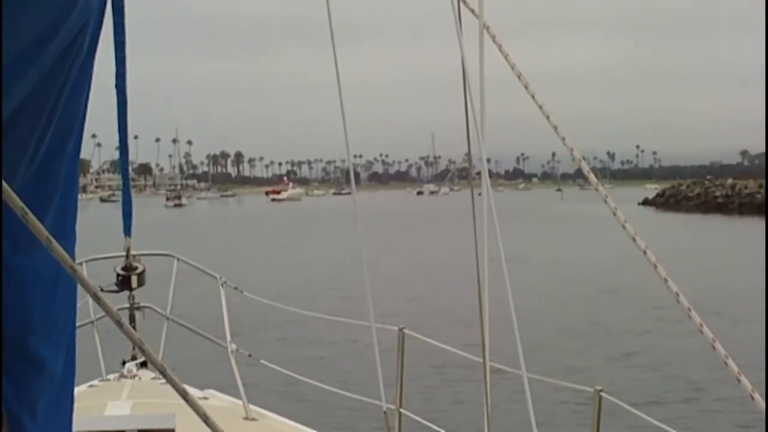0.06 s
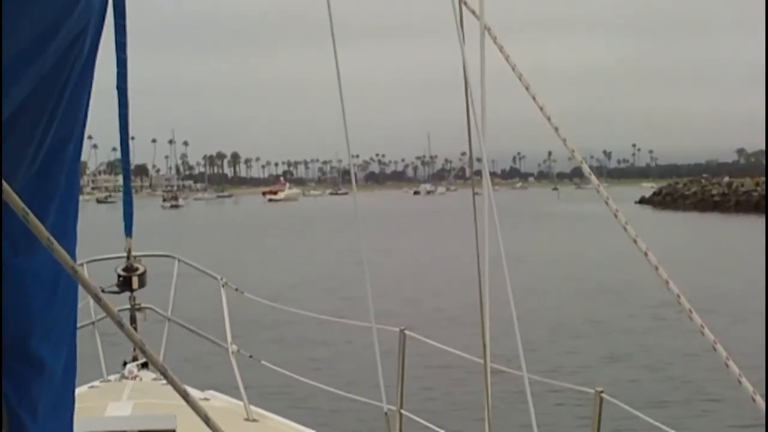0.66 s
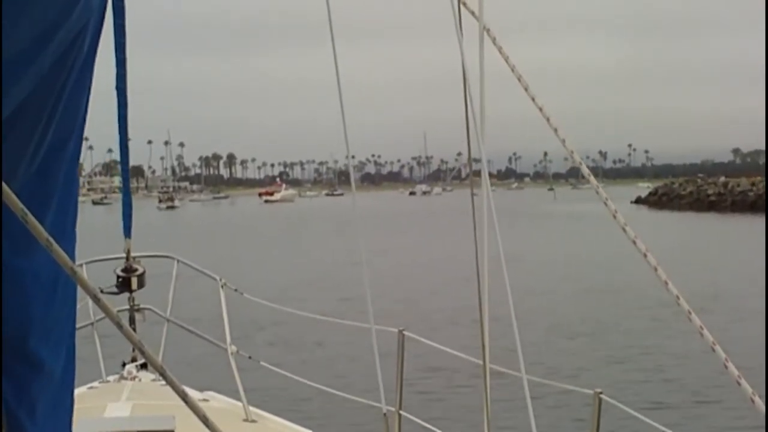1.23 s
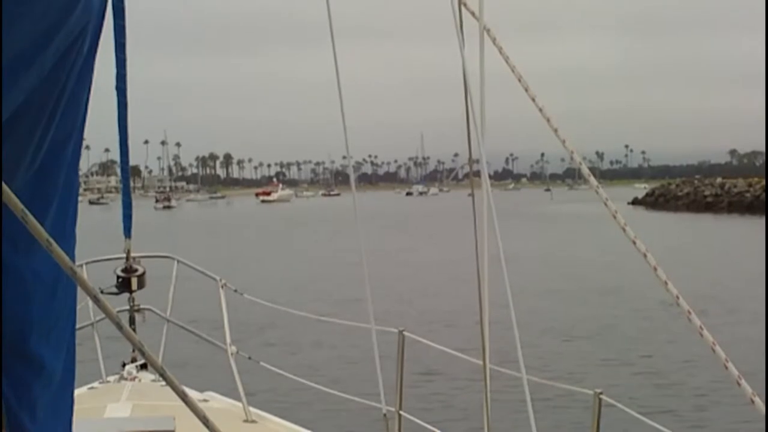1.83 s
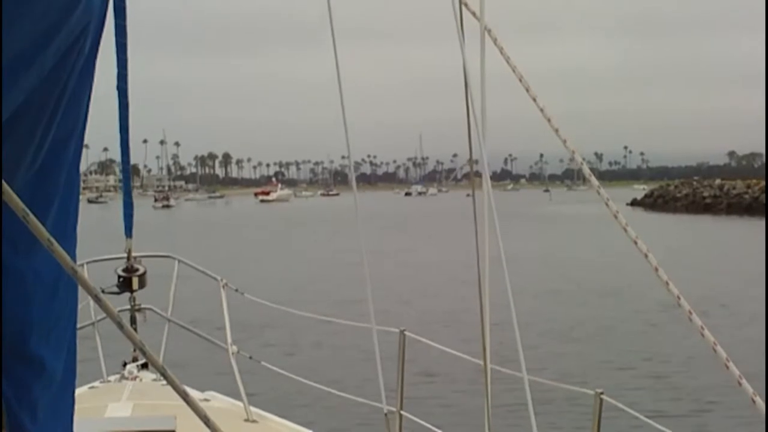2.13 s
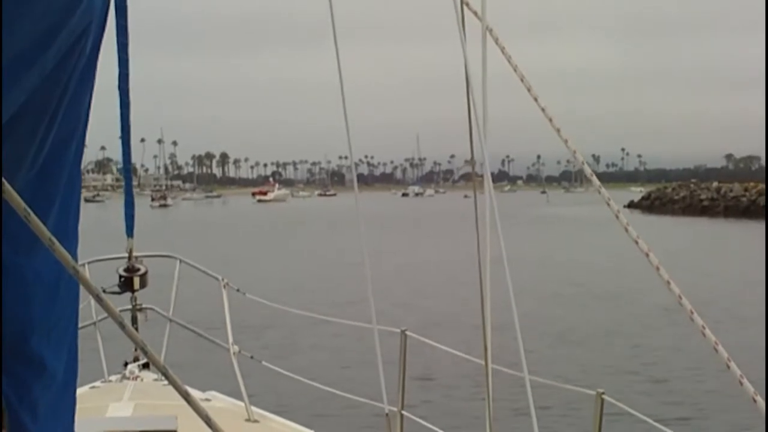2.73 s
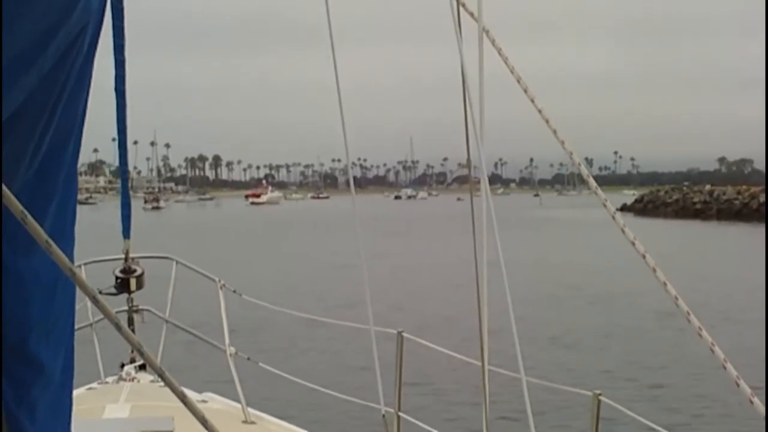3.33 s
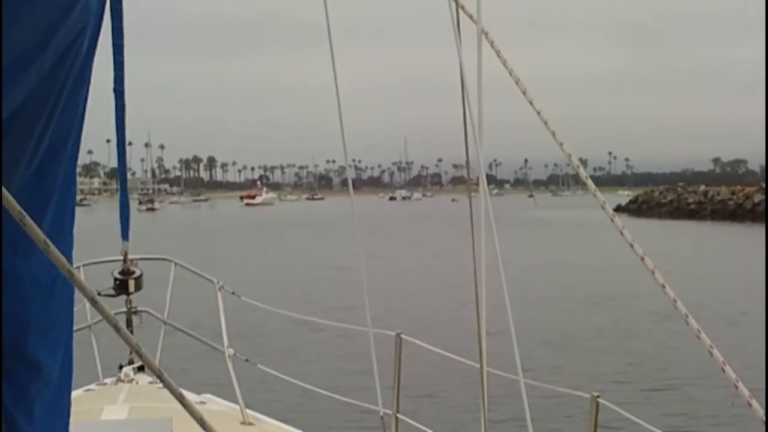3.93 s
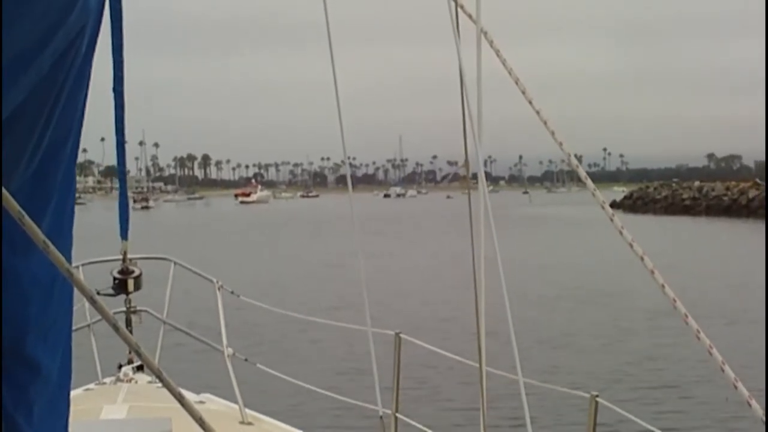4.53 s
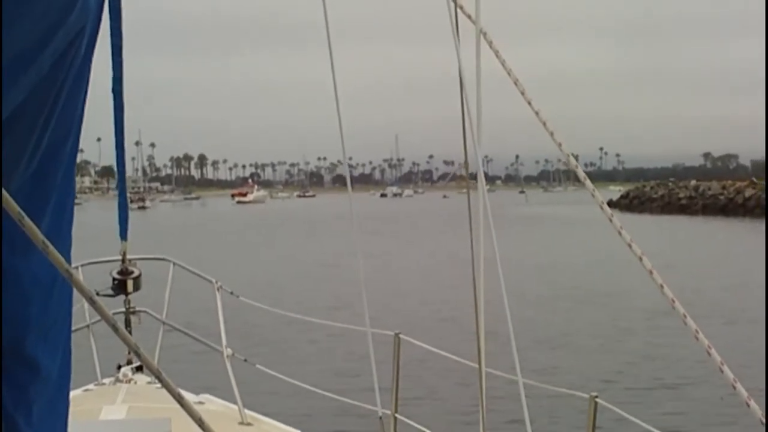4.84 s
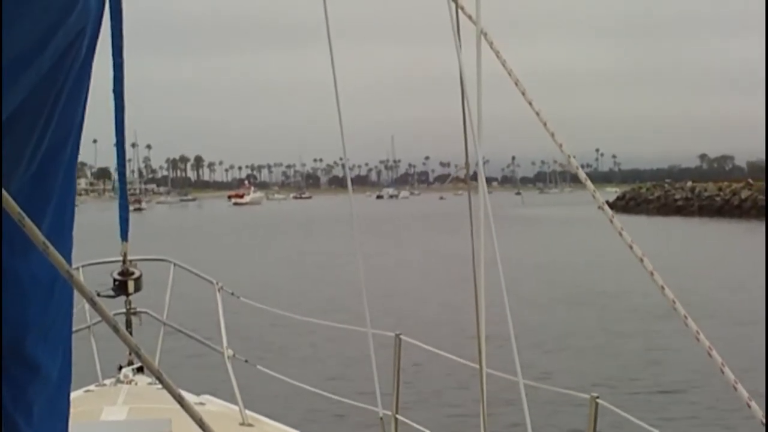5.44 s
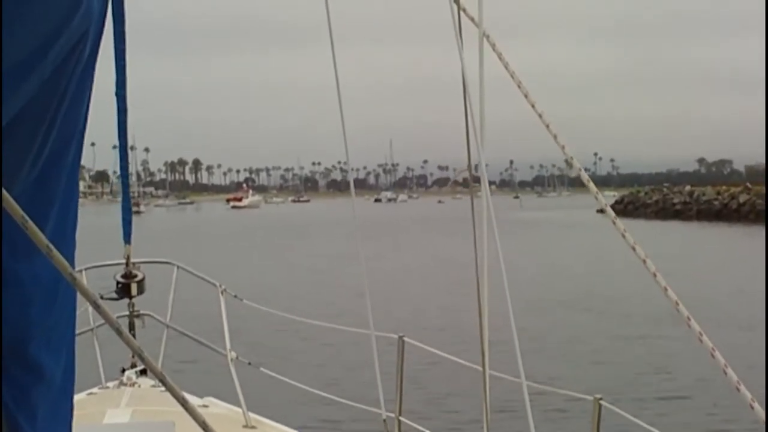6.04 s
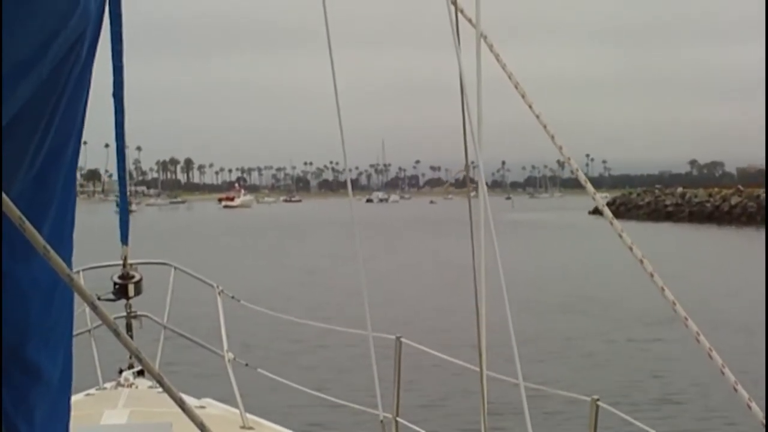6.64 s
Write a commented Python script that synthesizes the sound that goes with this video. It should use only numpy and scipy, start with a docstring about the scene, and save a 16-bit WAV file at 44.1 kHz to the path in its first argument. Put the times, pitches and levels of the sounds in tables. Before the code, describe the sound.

Small birds chirp and trill above a steady wash of wind and far surf, with a few ripples lapping at a sailboat.

```python
"""Water laps at the hull of an anchored sailing boat, heard on deck through one small microphone.
Close by, ripples trap air that rings in plops, and one hollow swell sloshes underneath.
Small birds twitter past on a low and a high voice: arched whistles, trills, two-note flourishes,
pips, and twice the same nasal chatter. Far across the calm harbour motors hum,
and a light wind rumbles over the wash of distant surf."""
import sys
import numpy as np
from scipy import signal
from scipy.fft import rfft, irfft
from scipy.io import wavfile

SR = 44100
rng = np.random.default_rng(int(sys.argv[2]) if len(sys.argv) > 2 else 0)


def transcribe(signal):
    """Save signal, clipped to [-1, 1], as a 16-bit WAV file at the path in sys.argv[1]."""
    frames = np.atleast_2d(signal).T
    limited = np.clip(frames, -1, 1)
    pcm = np.round(limited * 32767).astype(np.int16)
    wavfile.write(sys.argv[1], SR, pcm)


N = 295029
TIME = np.arange(N) / SR

# colours of the wind, the distant surf and the high hiss: f/Hz, relative level/dB
WIND_SPECTRUM = [(20, -15), (34, -12), (48, -1), (65, -1), (95, -0.5), (135, 1), (200, -3.5), (300, -4),
                 (380, -6.5), (450, -17), (700, -31)]
SURF_SPECTRUM = [(300, -32), (440, -9), (530, -0.5), (700, 0), (940, -2), (1110, 2), (1330, -6), (1700, -7),
                 (2050, -13.5), (2900, -15.5), (3400, -19), (5000, -29)]
HISS_SPECTRUM = [(1500, -14), (3200, 0), (4500, 4), (6500, 5.5), (7100, 2), (7500, -37.5)]
# motors far across the water: start/s, end/s, f/Hz, level/dB, waver/share of pitch
MOTOR_HUMS = [(2.5, 4.15, 167, -57.5, 0.0036), (0.3, 2.38, 140, -60.5, 0.01), (0, 3.7, 242, -63.5, .006),
              (5, 6, 127, -60, 0.014), (6, 7.8, 140, -58.5, 0.0095), (-0.5, 7.9, 97, -66.5, 0.017),
              (1.5, 7.7, 50, -64, .02)]

# a whistle's second harmonic, strongest on the low voice: fundamental f/Hz, relative level/dB
OCTAVE_LEVELS = [(1650, -13), (2250, -16.5), (2850, -7), (3400, -19), (3700, -14.5), (4100, -22)]
# resonances of throat and beak: f/Hz, half width/Hz, gain/dB
BEAK_RESONANCES = [(2840, 800, 2), (5700, 230, -12)]
# arched whistles: t/s, length/s, f/Hz, level/dB, accent/dB
ARCHED_WHISTLES = [(.08, .042, 3070, -59, 0), (.61, 0.068, 2970, -62, 0), (.672, .045, 3520, -59, 0),
                   (.727, .058, 3500, -57.5, 0), (1.764, .072, 3000, -54, 9), (2.603, .24, 2305, -63, 1),
                   (4.42, .03, 3080, -57, 0), (4.482, .036, 3030, -49.5, 1), (6.377, 0.068, 2986, -50, 9.5),
                   (6.527, 0.029, 3030, -52.5, 0)]
# runs of buzzy notes: t/s, notes, spacing/s, note length/s, f/Hz, level/dB, change per note/dB
TRILLS = [(.176, 2, .044, .023, 3830, -51, -8), (1.847, 2, 0.042, 0.03, 3690, -41, -2),
          (2.642, 3, .04, 0.017, 3860, -50, -1), (4.559, 2, 0.043, 0.03, 3690, -46, -6),
          (5.52, 2, .045, 0.018, 3880, -48.5, 1.5), (5.533, 2, .053, 0.019, 2790, -43, -3),
          (6.456, 2, .044, 0.024, 3860, -53, 2), (6.462, 2, 0.047, .03, 2800, -42, -2.5)]
# a held high note, then a low drop: t/s, high f/Hz, level/dB, drop delay/s, drop level/dB
CLOSING_FLOURISHES = [(1.957, 3864, -46.5, 0.037, -46), (4.641, 4050, -51, .052, -55),
                      (6.532, 4140, -51, .056, -54)]
# single falling pips: t/s, length/s, f/Hz, level/dB
LONE_PIPS = [(.137, 0.011, 3950, -54), (0.145, .012, 2780, -54), (.223, .012, 2700, -54),
             (1.011, .022, 1648, -45), (1.096, 0.029, 1600, -51), (1.19, .037, 1490, -52),
             (2.146, 0.023, 2700, -53.5), (2.194, 0.011, 2150, -49.5), (2.246, .011, 1920, -48),
             (2.318, .028, 2400, -55), (3.452, .024, 2800, -52.5), (3.533, .014, 3930, -52),
             (4.514, .027, 3950, -46), (4.533, 0.019, 2890, -47), (5.474, .012, 4100, -53),
             (5.484, 0.023, 2860, -48.5), (5.631, .013, 3950, -55.5), (5.643, .018, 2720, -55)]
# a flick up, a slur down, three ticks: delay/s, length/s, f/Hz, glide/share of pitch, relative level/dB
CHATTER_NOTES = [(0, .011, 1333, .2, -3), (0.017, .026, 1471, -.14, -0.5), (0.058, 0.01, 1160, .03, -3.5),
                 (0.097, .009, 543, .14, -4.5), (0.126, .009, 600, .1, -3)]
# each time the chatter comes: t/s, level/dB, fade/(dB/s), ending level/dB
CHATTER_PHRASES = [(.822, -42.5, 26, -54.5), (3.387, -40.5, -2, -46)]
# a note's pitch at its start, middle and end, as shares of its nominal pitch
ARCH_SHAPE, TRILL_SHAPE = (.915, .99, .905), (1.02, .99, .97)
HELD_SHAPE, FALL_SHAPE = (1.012, .99, .97), (1.028, .99, .98)
SLUR_SHAPE, WHINE_SHAPE = (.97, .97, .85), (1.02, .96, .91)

# hollow colour of the swell under the hull: f/Hz, relative level/dB
SLOSH_SPECTRUM = [(90, -31.5), (140, 1.5), (190, -3.5), (270, -7.5), (345, 0.5), (430, -15.5), (900, -10),
                  (1300, -29)]
# ripples closing on the hull, near the microphone: t/s, bubble f/Hz, level/dB
HULL_PLOPS = [(1.421, 616, -32), (1.585, 546, -34.5), (1.594, 720, -38.5), (4.246, 710, -37),
              (4.296, 552, -39.5), (4.374, 1120, -38), (6.105, 1300, -38.5)]


def undb(db):
    """Decibels to gain."""
    return 10 ** (np.asarray(db) / 20)


def unit(x):
    """Scale to rms 1."""
    return x / np.sqrt(np.mean(x ** 2))


def add(out, start, x):
    """Mix x into out from start, in seconds."""
    i = max(int(start * SR), 0)
    out[i:i + len(x)] += x[:max(len(out) - i, 0)]


def decay(t, t60):
    """A fall of 60 dB every t60 seconds."""
    return np.exp(-np.log(1000) * t / t60)


def phase_of(hz):
    """Phase of a moving pitch."""
    return 2 * np.pi * np.cumsum(hz) / SR


def drift(rate_hz):
    """Smooth random motion of rms 1 over the whole scene."""
    hz = np.fft.rfftfreq(N, 1 / SR)
    return unit(irfft(rfft(rng.standard_normal(N)) * np.exp(-(hz / rate_hz) ** 2), N))


def tremor(size, rate_hz):
    """Quick random motion over one note, spread near 1."""
    steps = np.arange(size) * rate_hz / SR
    return np.interp(steps, np.arange(256), rng.standard_normal(256))


def noise(spectrum):
    """Noise of rms 1 in the given colour."""
    hz, db = np.transpose(spectrum)
    f = np.fft.rfftfreq(N, 1 / SR) + 1
    gain = undb(np.interp(np.log(f), np.log(hz), db, left=-80, right=-80))
    return unit(irfft(rfft(rng.standard_normal(N)) * gain, N))


def restless(x, flicker_db, rate_hz, octaves=9):
    """Each octave of x swells and fades on its own."""
    f = np.fft.rfftfreq(N, 1 / SR) + 1
    octave = np.clip(np.log2(f / 30), 0, octaves - 1)
    spectrum = rfft(x)
    bands = (irfft(spectrum * np.maximum(1 - abs(octave - k), 0), N) for k in range(octaves))
    return unit(sum(band * undb(flicker_db * drift(rate_hz)) for band in bands))


def wind_and_surf():
    """The harbour's ambience: light wind rumble, distant surf and a smooth high hiss."""
    wind = undb(-50.5) * restless(noise(WIND_SPECTRUM), flicker_db=1.3, rate_hz=4.7)
    surf = undb(-45) * restless(noise(SURF_SPECTRUM), flicker_db=.93, rate_hz=2.2)
    hiss = undb(-58.5) * noise(HISS_SPECTRUM)
    return wind + surf + hiss


def far_motors(fade_s=.14, wander_db=2.4):
    """Low wavering tones that come and go across the water."""
    out = np.zeros(N)
    for start, end, hz, db, waver in MOTOR_HUMS:
        fade = np.clip(np.minimum(TIME - start, end - TIME) / fade_s, 0, 1)
        gain = undb(db + wander_db * drift(rate_hz=4))
        pitch = hz * (1 + waver * drift(rate_hz=12))
        out += gain * fade * unit(np.sin(phase_of(pitch)))
    return out


def syllable(length, pitch_hz, shape, edge=.35, jitter=.008, shimmer_db=1.6):
    """Time, curved pitch and soft-edged envelope of a bird note; the syrinx trembles in pitch and level."""
    t = np.arange(int(length * SR)) / SR
    contour = np.polyval(np.polyfit([0, .5, 1], shape, 2), t / t[-1])
    hz = pitch_hz * contour * (1 + jitter * tremor(len(t), rate_hz=350))
    shimmer = undb(shimmer_db * tremor(len(t), rate_hz=350))
    return t, hz, signal.windows.tukey(len(t), edge) * shimmer


def whistle(hz):
    """A bird's clear voice: a sine with a weaker octave."""
    phase = phase_of(hz)
    octave_db = np.interp(np.mean(hz), *np.transpose(OCTAVE_LEVELS))
    return unit(np.sin(phase) + undb(octave_db) * np.sin(2 * phase))


def arched_note(length, pitch_hz, accent_db, accent_at=.8, accent_width=.17):
    """A whistle that climbs and is pushed by accent_db as it falls."""
    t, hz, envelope = syllable(length, pitch_hz, ARCH_SHAPE, edge=.25)
    accent = np.exp(-((t / t[-1] - accent_at) / accent_width) ** 2)
    return envelope * undb(accent_db * accent) * whistle(hz)


def pure_note(length, pitch_hz, shape, fade_db=0, edge=.45):
    """A whistled note that fades by fade_db from start to end."""
    t, hz, envelope = syllable(length, pitch_hz, shape, edge)
    return envelope * undb(-fade_db * (t / t[-1] - .5)) * whistle(hz)


def buzzy_note(length, pitch_hz, beat_hz=93.5, swing=.031, depth=.65, fade_db=5):
    """Every beat of the trill is a small falling chirp, weaker than the last."""
    t, hz, envelope = syllable(length, pitch_hz, TRILL_SHAPE, edge=.21)
    beat = 2 * np.pi * beat_hz * t
    pulses = 1 - depth * np.cos(beat / 2) ** 2
    chirps = whistle(hz * (1 + swing * np.sin(beat)))
    return envelope * pulses * undb(-fade_db * t / t[-1]) * chirps


def nasal_note(length, pitch_hz, shape, harmonics=9, jitter=.02):
    """Throat and beak favour whichever harmonics lie near their resonances."""
    t, hz, envelope = syllable(length, pitch_hz, shape)
    hz = hz * (1 + jitter * tremor(len(t), rate_hz=1200))
    k = np.arange(1, harmonics + 1)[:, None]
    gain = sum(undb(db) / (1 + ((k * hz - centre) / width) ** 2) for centre, width, db in BEAK_RESONANCES)
    return envelope * unit(np.sum(gain * np.sin(k * phase_of(hz)), axis=0))


def bird_twitter():
    """Small birds passing the boat: arched whistles, trills, closing flourishes and lone pips."""
    out = np.zeros(N)
    for start, length, hz, db, accent_db in ARCHED_WHISTLES:
        add(out, start, undb(db) * arched_note(length, hz, accent_db))
    for start, notes, spacing, length, hz, db, change_db in TRILLS:
        for k in range(notes):
            add(out, start + k * spacing, undb(db + k * change_db) * buzzy_note(length, hz))
    for start, hz, db, drop_delay, drop_db in CLOSING_FLOURISHES:
        held = pure_note(length=.056, pitch_hz=hz, shape=HELD_SHAPE, fade_db=3)
        drop = pure_note(length=.024, pitch_hz=2626, shape=FALL_SHAPE)
        add(out, start, undb(db) * held)
        add(out, start + drop_delay, undb(drop_db) * drop)
    for start, length, hz, db in LONE_PIPS:
        add(out, start, undb(db) * pure_note(length, hz, FALL_SHAPE))
    return out


def bird_chatter(slur_delay_s=.138, whine_delay_s=.186):
    """A bird's set phrase: five nasal notes, a raspy downslur and a falling whine."""
    out = np.zeros(N)
    for start, db, fade_db_per_s, ending_db in CHATTER_PHRASES:
        for delay, length, hz, glide, note_db in CHATTER_NOTES:
            note = nasal_note(length, hz, shape=(1 - glide / 2, 1, 1 + glide / 2))
            add(out, start + delay, undb(db + note_db - fade_db_per_s * delay) * note)
        slur = pure_note(length=.054, pitch_hz=2600, shape=SLUR_SHAPE, fade_db=5, edge=.33)
        rasp_db = 2.5 * tremor(len(slur), rate_hz=300)
        add(out, start + slur_delay_s, undb(ending_db + rasp_db) * slur)
        whine = nasal_note(length=.033, pitch_hz=1140, shape=WHINE_SHAPE)
        add(out, start + whine_delay_s, undb(ending_db - .5) * whine)
    return out


def deck_reflections(x, wet_db, t60):
    """Deck, rigging and water throw a thin short tail back to the microphone."""
    t = np.arange(SR // 2) / SR
    tail = rng.standard_normal(len(t)) * decay(t, t60)
    return x + undb(wet_db) * signal.fftconvolve(x, tail / np.linalg.norm(tail))[:N]


def hull_slosh(start_s=4.165, attack_s=.056, hold_s=.08, t60=.75, level_db=-42):
    """One hollow swell under the hull rises, holds and dies away."""
    rise = np.clip((TIME - start_s) / attack_s, 0, 1)
    ebb_time = np.maximum(TIME - start_s - attack_s - hold_s, 0)
    return undb(level_db) * noise(SLOSH_SPECTRUM) * rise * decay(ebb_time, t60)


def bubble(hz, t60, rise=.12, splash=.5, attack_s=.0042):
    """A trapped air pocket rings and rises in pitch, with a short splash around its note."""
    t = np.arange(int(t60 * SR)) / SR
    band = signal.butter(2, [hz / 2, hz * 2], "band", fs=SR, output="sos")
    spray = unit(signal.sosfilt(band, rng.standard_normal(len(t))))
    ring = np.sin(phase_of(hz * (1 + rise * t / t60)))
    return (ring + splash * spray) * (1 - np.exp(-t / attack_s)) * decay(t, t60)


def hull_ripples(faint_db=-50, spread_db=8, low_hz=500, high_hz=1700, ring_cycles=35, count=50):
    """Ripples close on the hull just below the microphone: a few clear plops among many faint ones."""
    out = np.zeros(N)
    for start, hz, db in HULL_PLOPS:
        add(out, start, undb(db) * bubble(hz, t60=.092))
    for when, pitch_share, force in rng.random((count, 3)):
        hz = low_hz * (high_hz / low_hz) ** pitch_share
        db = faint_db + spread_db * (force - .5)
        add(out, when * N / SR, undb(db) * bubble(hz, t60=ring_cycles / hz))
    return out


def scene():
    """Everything reaches one microphone on deck, alike in both channels."""
    background = wind_and_surf() + far_motors()
    water = hull_ripples() + hull_slosh()
    birds = deck_reflections(bird_twitter() + bird_chatter(), wet_db=-12, t60=.36)
    mono = background + birds + water
    return np.array([mono, mono])


def record(dry):
    """The small recorder cuts the top steeply above 7450 Hz."""
    return signal.sosfilt(signal.ellip(10, .2, 70, 7450, fs=SR, output="sos"), dry)


dry = scene()
out = record(dry)
transcribe(out)
```